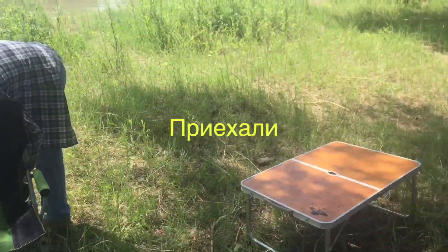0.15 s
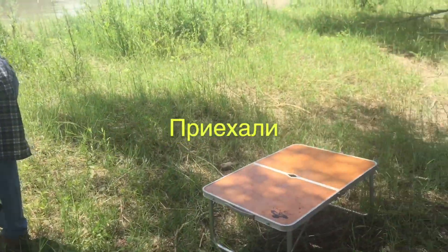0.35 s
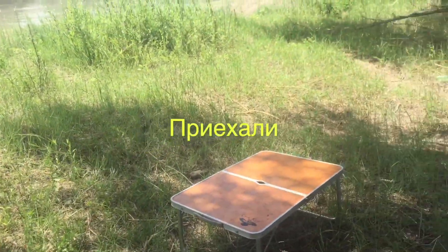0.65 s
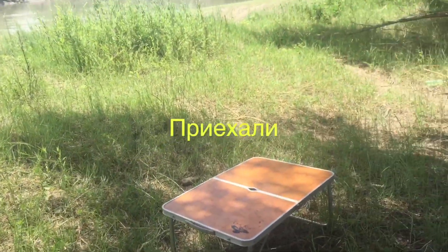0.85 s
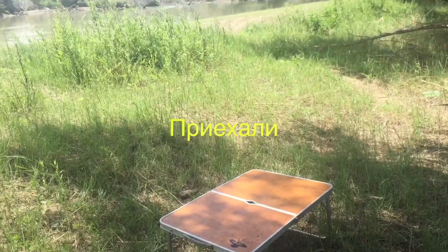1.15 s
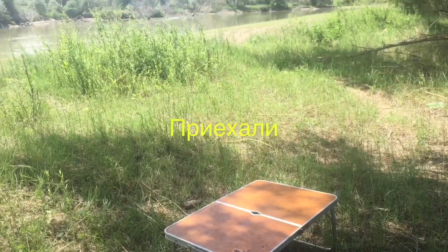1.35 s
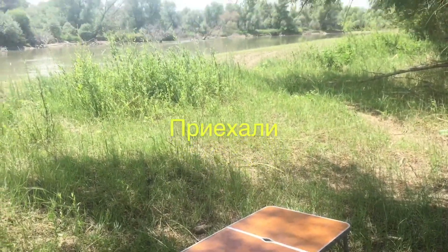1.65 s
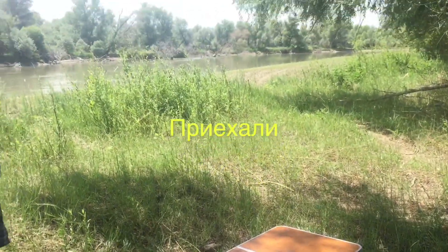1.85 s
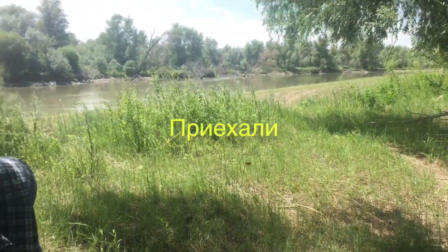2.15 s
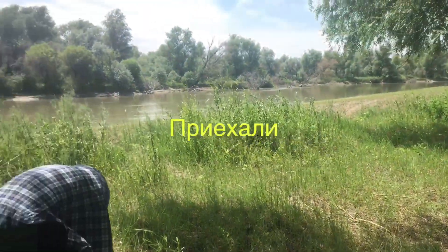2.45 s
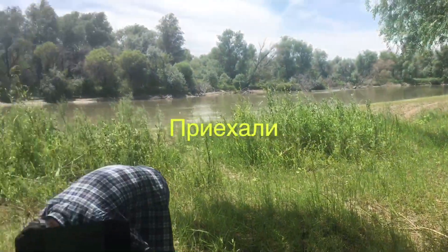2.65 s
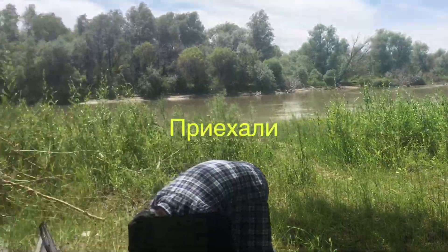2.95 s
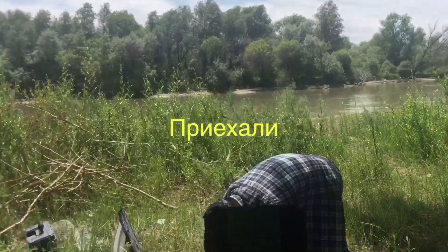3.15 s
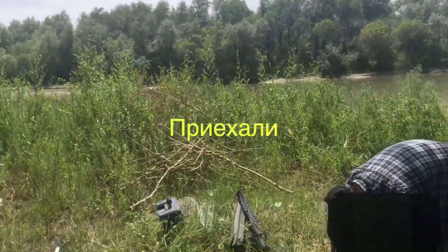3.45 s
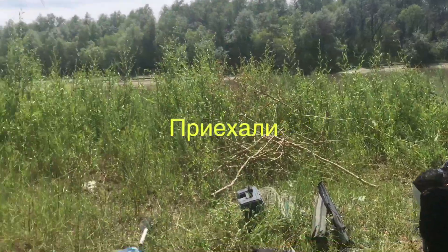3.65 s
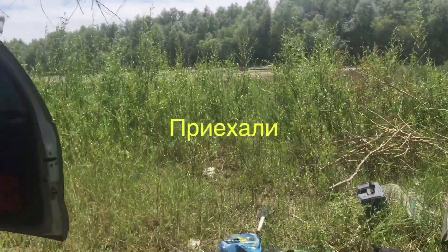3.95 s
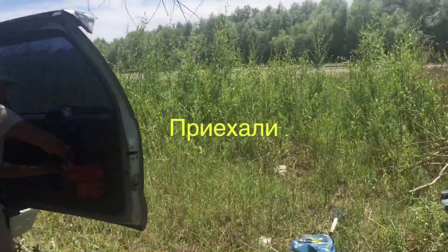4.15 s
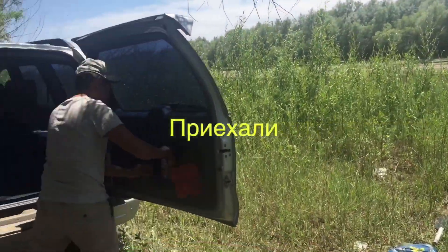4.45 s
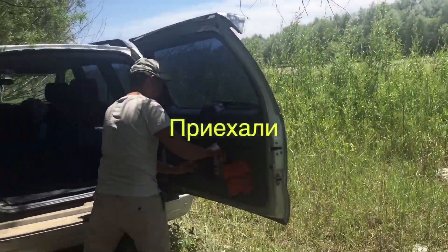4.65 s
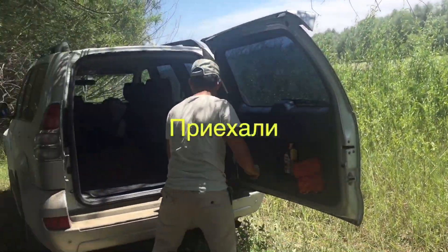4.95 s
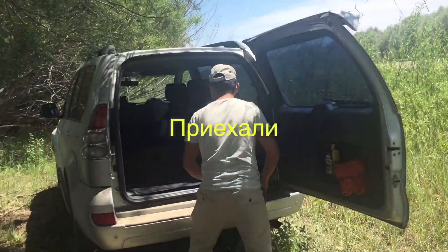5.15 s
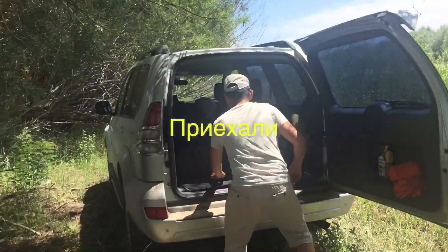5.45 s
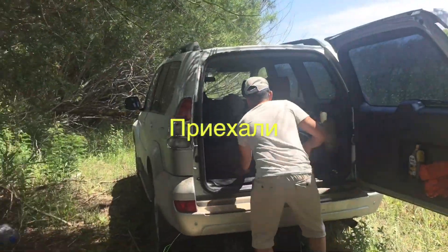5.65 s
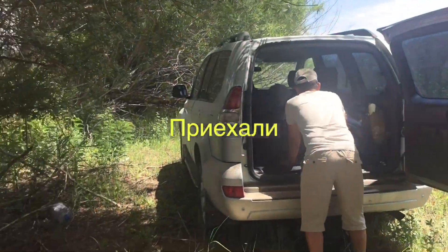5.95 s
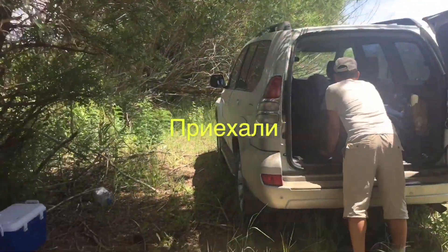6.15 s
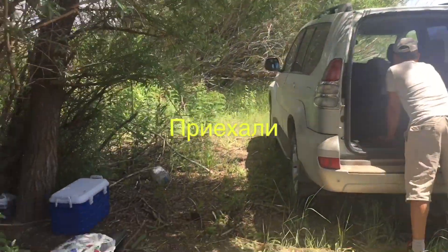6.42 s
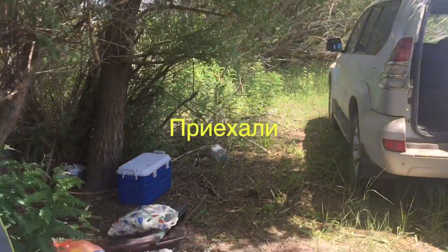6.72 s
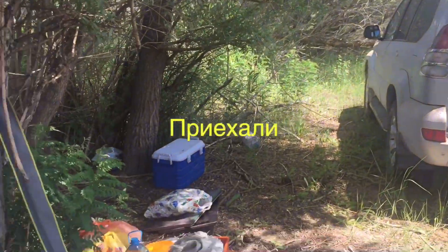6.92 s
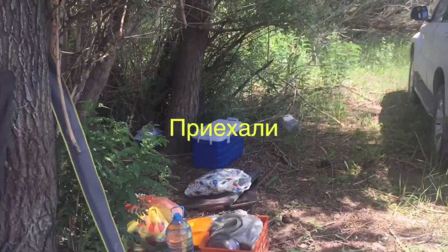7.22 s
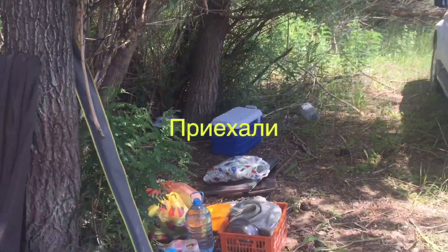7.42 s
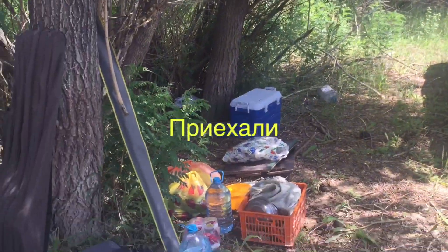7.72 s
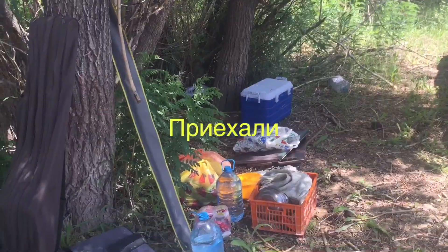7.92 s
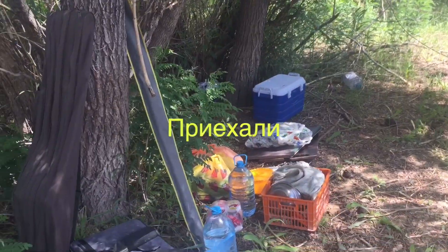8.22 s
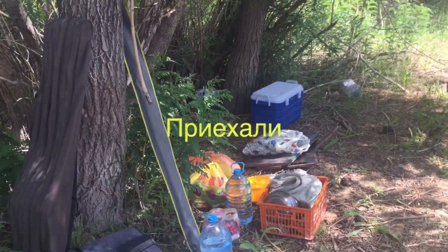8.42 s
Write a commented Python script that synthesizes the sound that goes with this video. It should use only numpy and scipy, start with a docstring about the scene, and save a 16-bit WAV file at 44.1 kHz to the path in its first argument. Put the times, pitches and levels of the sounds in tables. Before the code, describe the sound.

Outdoors under trees, bright birdsong with distant chirping birds, over soft air noise, as bags rustle, catches click and loads knock in a car boot.

```python
"""Riverside trees beside a car: a songbird sings slurs, sweeps, buzzes and a trill, in leafy echoes.
Its notes are gliding tones; other birds repeat short motifs further off, made of straight glides.
Close by, camping gear is unloaded: shaped noise makes cloth and bags rustle, short bursts make twigs and
catches click, and decaying tones and resonances make loads knock and thump on the boot floor.
A fly passes as a humming wing beat, over noise for ground, river, leaves and microphone hiss."""
import sys
import numpy as np
from scipy import signal
from scipy.fft import rfft, irfft, next_fast_len
from scipy.io import wavfile
from scipy.ndimage import uniform_filter1d, map_coordinates

SR = 44100
rng = np.random.default_rng(int(sys.argv[2]) if len(sys.argv) > 2 else 0)


def inscribe(sig):
    """Save sig as 16-bit PCM at rate SR to the path in sys.argv[1].

    A 1-D sig is mono; a 2-D sig holds one channel per row.
    Samples are clipped to [-1, 1] before scaling.
    """
    pcm = np.round(np.clip(np.atleast_2d(sig).T, -1, 1) * 32767)
    wavfile.write(sys.argv[1], SR, pcm.astype(np.int16))


N = 378378  # length of the scene in samples

# Levels here are mixing levels: echoes, random wavering and the microphone act on them later.

# The singer's slurs, sweeps. Each row: start in seconds, pitch factor, level in dB.
SLUR_TIMES = [(0.885, 0.95, -40), (1.039, 1.018, -38), (1.187, 0.98, -38), (1.32, 1.01, -39),
              (1.451, 1.01, -37)]
SWEEP_TIMES = [(4.838, 1.02, -52), (5.187, 0.98, -43.5), (5.468, 1.002, -41), (5.812, 1.04, -39),
               (6.093, 1, -37.5)]
# Buzzes. Each row: start in seconds, pitch factor, level in dB, pitch factor of the arch sung over it.
BUZZ_TIMES = [(6.315, 1.03, -49.5, 0.96), (6.521, 1.07, -52, 1.03), (6.713, 0.99, -50, 1.03),
              (6.9, 0.93, -52.5, 1.06), (7.097, 0.99, -49, 0.98)]
# Trill syllables. Each row: start in seconds, dip level in dB, tip level in dB.
TRILL_TIMES = [(7.448, -42, -40), (7.532, -41.5, -39.5), (7.616, -40, -39), (7.7, -41.5, -43),
               (7.789, -42, -44.5), (7.881, -46, -43.5), (7.971, -47, -43.5), (8.057, -45, -45),
               (8.151, -44.5, -45)]
# Shapes of single notes. Each row: seconds into the note, pitch in Hz, relative level in dB.
# The pitch of the first seven is scaled for each note sung; the time of the drop is stretched instead.
SWEEP_SHAPE = [(0, 7520, -24), (.008, 6250, -12), (.018, 5680, -10.5), (.046, 5210, -9.5),
               (.055, 4550, -4.5), (.064, 3150, -7.5), (.068, 2800, -11)]
CHUP_SHAPE = [(0, 2480, -9), (.007, 2658, -5), (.02, 2623, -1), (.03, 2430, -1.5), (.04, 2230, -11)]
BUZZ_SHAPE = [(0, 3880, -4.5), (.015, 4110, -0.5), (.04, 4197, -2.5), (.06, 4404, -2)]
ARCH_SHAPE = [(0, 3000, -15), (.013, 4100, -2), (.033, 5600, -17), (.043, 6950, -9), (.051, 6900, -7.5),
              (.058, 5850, 2.5), (.08, 4500, -12.5)]
DIP_SHAPE = [(0, 4074, -4), (.004, 3865, 2), (.011, 3050, -12.5), (.018, 3550, -1)]
TIP_SHAPE = [(0, 3770, -0.5), (.004, 3995, 0.5), (.011, 4050, -2.5), (.015, 3900, -26)]
HUMP_SHAPE = [(0, 2470, -5.5), (.03, 2744, 0), (.058, 2890, -0.5), (.085, 2640, 3), (.125, 1870, -24)]
DROP_SHAPE = [(0, 2850, -5), (.008, 2600, 0.5), (.03, 2280, -4), (.055, 1760, -22)]
# Humps, whistles that rise and fall. Each row: start in seconds, pitch factor, level in dB.
HUMP_TIMES = [(.028, 0.98, -48.5), (0.504, 0.98, -45)]
# Drops, whistles that end low. Each row: start in seconds, length factor, level in dB.
DROP_TIMES = [(.373, 1, -45.5), (1.697, 0.51, -47.5)]
# One list for each single whistle. Each row: time in seconds, pitch in Hz, level in dB.
SINGLE_WHISTLES = [
    [(2.565, 4300, -60), (2.6, 3700, -53.5), (2.635, 3055, -48.5), (2.665, 2590, -63)],
    [(2.81, 2540, -56.5), (2.87, 3143, -45.5), (2.95, 3607, -42.5), (3.06, 4400, -48.5), (3.09, 4490, -59)],
    [(.811, 2510, -60), (.819, 2050, -55), (.838, 1760, -70)],
    [(3.15, 4900, -59), (3.166, 3960, -45.5), (3.199, 2153, -50.5), (3.25, 3985, -47), (3.274, 3000, -42),
     (3.308, 2964, -54)],
    [(3.36, 3760, -55), (3.385, 3700, -43.5), (3.412, 4400, -49), (3.44, 4250, -50.5), (3.48, 3470, -45.5),
     (3.55, 2720, -50.5), (3.63, 2190, -69)],
    [(6.205, 3730, -54), (6.24, 3630, -65), (6.28, 3960, -60), (6.31, 4380, -58)],
]
# A nasal note from both sides of the voice box.
# Each row: time in seconds, left pitch in Hz, right pitch in Hz, level in dB.
NASAL_NOTE = [(7.294, 1287, 1780, -60), (7.315, 1322, 1853, -52.5), (7.349, 1476, 1873, -51.5),
              (7.385, 1645, 1920, -44.5), (7.414, 1673, 1864, -57)]

# Motifs of further birds, as glides.
# Each row: seconds into the motif, length in seconds, first pitch in Hz, last pitch in Hz, relative level in dB.
HIGH_LOW_MOTIF = [(0, 0.0246, 4256, 4150, 0), (.045, 0.0324, 3450, 3070, 1.5)]
UP_DOWN_MOTIF = [(0, 0.01546, 1900, 2220, -4.5), (.048, 0.037, 2715, 2512, 0.5)]
HOOK_MOTIF = [(0, 0.028, 2850, 2820, 0.5), (.025, 0.021, 2820, 2390, -3), (.11, .018, 2280, 2900, -2.5),
              (.128, 0.019, 2900, 2305, -3)]
SEEP_MOTIF = [(0, 0.017, 5800, 5720, 0.0044)]
# When each motif is sung: first start in seconds, period in seconds, list of one level in dB per repeat.
HIGH_LOW_REPEATS = (1.667, .2318, [-71, -60, -55.5, -53.5, -61, -54, -53.5, -57.5])
UP_DOWN_REPEATS = (1.648, .1855, [-55.5, -49.5, -50, -52, -53, -49.5])
HOOK_REPEATS = (4.773, .277, [-61, -60, -64])
SEEP_REPEATS = (4.083, .1055, [-58, -61, -57, -62, -65])
# Single level peeps. Each row: start in seconds, first pitch in Hz, level in dB.
PEEP_TIMES = [(.772, 2570, -59.5), (2.65, 2620, -51), (2.692, 2440, -55.5), (3.936, 4270, -56.5),
              (3.972, 4250, -59.5), (4.349, 3230, -56.5), (4.39, 3160, -58.5), (4.008, 4450, -57),
              (4.5, 3023, -58), (6.79, 2620, -63), (7.07, 2620, -65)]

# Clicks of twigs and catches.
# Each row: start in seconds, then relative levels in dB of the bright, thin top and dull parts.
CLICK_TIMES = [(0.051, -49, -60, -58), (0.1577, -62, -82, -47.5), (0.2778, -50, -61, -52.5),
               (1.0239, -51, -75, -42), (1.574, -34, -48, -40), (2.4522, -27, -35, -39),
               (3.0965, -43, -60, -57), (3.8956, -49, -71, -50.5), (4.3269, -48, -75, -43.5),
               (4.446, -43, -63, -52.5), (4.6883, -49, -41, -51.5), (4.705, -46.5, -63, -61),
               (5.678, -49.5, -64, -62), (5.892, -63, -64, -43.5), (5.912, -60, -61, -70),
               (6.863, -47, -61, -68), (6.919, -58, -68, -57), (6.974, -43, -53, -67),
               (7.009, -55, -56, -72), (7.033, -41, -62, -60), (7.0379, -29.5, -44, -50),
               (7.048, -60, -48, -70), (7.0582, -44, -49, -53), (7.218, -51, -67, -78),
               (8.014, -62, -56, -85), (8.1967, -33, -49, -65), (8.2534, -40, -54, -59.5),
               (8.353, -51, -61, -57), (8.3757, -5.5, -25, -37), (8.53, -46.5, -83, -61)]
# Colour of the bright crack. Each row: frequency in Hz, relative level in dB.
BRIGHT_COLOUR = [(1470, -72), (2500, -13), (3930, -7.5), (5760, -3.5), (7060, -2), (10000, -6.5),
                 (13000, -43), (22000, -120)]
# Knocks. Each row: start in seconds, level in dB, main pitch in Hz, seconds to fall by 60 dB.
KNOCK_TIMES = [(0.273, -44.5, 531, 0.04), (0.629, -50, 239, 0.093), (1.764, -40.5, 175, 0.025),
               (1.77, -46, 75, .2), (4.44, -44.5, 708, 0.029), (4.689, -21, 553, 0.011),
               (4.728, -39, 570, 0.016), (5.118, -44, 1070, 0.023), (5.146, -47, 1000, 0.028),
               (5.854, -43, 1300, .012), (5.872, -38, 900, .012), (5.893, -26, 1380, 0.013),
               (5.899, -29.5, 910, 0.015), (5.912, -31, 1430, 0.011), (5.919, -36, 1100, 0.012),
               (5.959, -40, 1400, 0.0091), (6.913, -44, 338, 0.046), (7.033, -32.5, 919, 0.021),
               (7.057, -30, 573, 0.0092), (8.3761, -24.5, 450, 0.0097), (8.392, -43.5, 554, 0.061)]
# Thumps on the boot floor. Each row: start in seconds, relative level in dB, extra bass in dB.
THUMP_TIMES = [(3.734, -25, -11), (3.778, -34.5, -7.5), (3.858, -43, -16), (3.894, -39.5, -12),
               (4.037, -44.5, -3.5), (4.16, -39.5, -7), (4.175, -46.5, 6), (4.249, -43, -6),
               (4.327, -32, -7.5)]
# Resonances of the boot floor. Each row: centre in Hz, width in Hz, level in dB before the extra bass.
BOOT_FLOOR = [(56, 8.3, 9.5), (92, 11, 6), (126.6, 11.3, 10.5), (291.4, 31, -2.5), (410, 57, -12),
              (604, 163, -17), (1300, 460, -24.5)]
# Ringing tones of a steel catch and of a hollow panel.
# Each row: pitch in Hz, relative level in dB before a small random change, seconds to fall by 60 dB.
STEEL_CATCH = [(1740, -15, 0.37), (3202, 0.5, 0.43), (4170, -1, 0.046), (8700, -8, 0.16)]
HOLLOW_PANEL = [(111.8, 3, 1), (148, -1.5, 0.35), (315, -10.5, 0.94), (630, -15, 0.7)]
# The one blow on the catch: start in seconds, level in dB.
CATCH_HIT = (2.452, -35)
# Blows on the panel. Each row: start in seconds, level in dB.
PANEL_HITS = [(.29, -48.5), (0.518, -56.5)]
# A box slides. Each row: time in seconds, level in dB.
DRAG_LEVEL = [(6.32, -73), (6.428, -49.5), (6.57, -75)]
# Hollow resonances of the box, each pass. Each row: centre in Hz, width in Hz, level in dB.
BOX_HOLLOW = [(450, 66, 4), (1146, 140, -2)]
# Cloth and bags are moved. Each row: start in seconds, length in seconds, crisp level in dB, dull level in dB.
RUSTLE_TIMES = [(0.013, 0.1, -62.5, -59.5), (0.423, 0.27, -68, -63), (1.148, 0.43, -74, -59.5),
                (1.557, 0.035, -54, -55), (1.893, 0.047, -68, -55.5), (2.035, 0.17, -65.5, -55),
                (2.196, 0.41, -57, -51), (2.988, 0.27, -68, -69), (3.298, 0.31, -61.5, -60.5),
                (3.848, 0.45, -57.5, -62), (4.15, 0.39, -61.5, -62.5), (4.524, 0.21, -64, -63),
                (5.05, 0.19, -73, -62), (5.798, 0.13, -60, -60.5), (6.904, 0.17, -53.5, -62),
                (6.996, 0.099, -57.5, -79), (7.117, 0.096, -62, -77), (7.696, 0.13, -60, -70.5),
                (8.234, 0.083, -61.5, -64)]

# A passing fly. Each row: time in seconds, wing beat in Hz, level in dB.
FLY_PATH = [(7.08, 172, -76), (7.18, 170, -71), (7.39, 154.6, -73), (7.5, 147, -78)]
# Overtones of the wing. Each row: multiple of the beat, relative level in dB.
WING_TONES = [(1, 4), (2, -13)]
# Steps and shuffling in the grass. Each row: time in seconds, swish level in dB, rumble level in dB.
GROUND_LEVEL = [(0.0, -62.5, -66), (3.44, -68, -74.5), (4.16, -67, -60.5), (4.87, -73.5, -73),
                (7, -73.5, -69.5), (7.4, -76.5, -69.5), (7.75, -82, -72.5), (8.58, -64.5, -74)]
# Noise colours: crisp and dull rustling, a low rumble, and the air (river, leaves and microphone hiss).
# Each row: frequency in Hz, relative level in dB.
CRISP_COLOUR = [(1470, -39), (2500, -21), (5010, -2.5), (6250, -3.5), (10500, -6), (14000, -7),
                (16100, -13), (16500, -41)]
DULL_COLOUR = [(240, -23), (400, -10.5), (1050, -3.5), (1900, -5.5), (4000, -11.5), (5200, -24),
               (8800, -120)]
RUMBLE_COLOUR = [(18, -45), (30, -1), (68, -0.5), (150, 0.5), (347, -4.5), (500, -30), (750, -120)]
AIR_COLOUR = [(15, -51), (25, 7.5), (65, 8), (150, 1), (296, -2.5), (3150, -8.5), (4240, -8.5),
              (7710, -14.5), (15200, -15.5), (16500, -41)]


def singer():
    """The songbird's direct sound with its returns from leaves, trunks and the wood's edge."""
    song, direct = song_phrases()
    whistles = single_whistles()
    full_voice = song + whistles
    near = echoes(full_voice, t60=0.18, delay=0.003, bend=1.03, trunks=7.8)
    add(near, 0.021, amp(-12.5) * (direct + whistles))  # one broad trunk answers clearly
    wood_edge = echoes(full_voice, t60=0.07, delay=0.044, bend=1.6, trunks=6.0)
    return direct + amp(-2.5) * whistles + amp(-2.5) * near + amp(-17.0) * wood_edge


def song_phrases():
    """Repeated note shapes, as (song for the echoes, direct sound); facing changes only the direct sound."""
    song, direct = np.zeros((2, N))
    # a chup closes each sweep and follows a share of the sweeps' crescendo
    chup_db, follows = -45.5, 0.59
    chups = [(s + 0.08, 1, chup_db + follows * (db - chup_db)) for s, _, db in SWEEP_TIMES]
    buzzes = [(s, pitch, db) for s, pitch, db, _ in BUZZ_TIMES]
    # the other side of the voice box whistles a louder arch over each buzz
    arches = [(s + 0.0185, arch_pitch, db + 7) for s, _, db, arch_pitch in BUZZ_TIMES]
    # a trill syllable is a dip, then a tip; the pitch factor creeps up by 0.035 a second
    climb = lambda s: 1 + 0.035 * (s - TRILL_TIMES[0][0])
    dips = [(s, climb(s), db) for s, db, _ in TRILL_TIMES]
    tips = [(s + 0.02, climb(s), db) for s, _, db in TRILL_TIMES]
    # each row: note shape, times sung, direct gain in dB from the way the bird faces, flutter settings
    phrases = [
        (slur(), SLUR_TIMES, -14, {}),
        (SWEEP_SHAPE, SWEEP_TIMES, 1.5, {}),
        (CHUP_SHAPE, chups, 5, {}),
        (ARCH_SHAPE, arches, -4, dict(buzz_hz=139, swing=0.25)),
        (BUZZ_SHAPE, buzzes, -6, dict(buzz_hz=397.6, swing=2.7, rasp=0.08)),
        (DIP_SHAPE, dips, -2.5, dict(buzz_hz=296, swing=0.53, rasp=0.052)),
        (TIP_SHAPE, tips, -1.5, dict(buzz_hz=400, swing=0.5, rasp=0.06))]
    for shape, sung, facing_db, timbre in phrases:
        for s, pitch, db in sung:
            sound = amp(db) * note(np.multiply(shape, [1, pitch, 1]), **timbre)
            add(song, s, sound)
            add(direct, s, amp(facing_db) * sound)
    # the other side of the voice box adds a faint high buzz to each syllable, heard only in the echoes
    high_buzz = [(0, 5800, -57), (0.015, 5500, -63), (0.035, 6200, -58)]
    for s, *_ in TRILL_TIMES:
        add(song, s, note(high_buzz, buzz_hz=300, swing=1.2, rasp=0.1))
    return song, direct


def slur():
    """Rows of a slur: the pitch leaves its top and settles onto a held pitch; the level swells, then fades."""
    top_hz, rest_hz = 3840, 2793
    hold_s, settle_s, length_s = 0.005, 0.018, 0.085
    s = np.linspace(0, length_s, num=14)
    hz = rest_hz + (top_hz - rest_hz) * np.exp(-np.maximum(s - hold_s, 0) / settle_s)
    db = np.interp(s / length_s, [0, 0.6, 1], [-5, 0, -12.5])
    return np.c_[s, hz, db]


def single_whistles():
    """Humps, drops and other single gliding whistles, with the two-voiced nasal note."""
    whistles = np.zeros(N)
    for s, pitch, db in HUMP_TIMES:
        add(whistles, s, amp(db) * note(np.multiply(HUMP_SHAPE, [1, pitch, 1])))
    for s, stretch, db in DROP_TIMES:
        add(whistles, s, amp(db) * note(np.multiply(DROP_SHAPE, [stretch, 1, 1])))
    for rows in SINGLE_WHISTLES:
        add(whistles, rows[0][0], note(rows))
    add(whistles, NASAL_NOTE[0][0], nasal_note())
    return whistles


def nasal_note():
    """Two coupled membranes give octaves and a sum tone; most of these are louder than either voice."""
    (left, right), size = voice(NASAL_NOTE)
    # both sides flutter unevenly
    flutter = np.cumsum(rng.standard_normal((2, len(size))), axis=1) * 0.035
    left, right = np.array([left, right]) + flutter
    octaves = np.sin(2 * left) + amp(-17) * np.sin(2 * right)
    sum_tone = amp(-5) * np.sin(left + right)
    voices = amp(-15) * np.sin(left) + amp(-21) * np.sin(right)
    return size * (octaves + sum_tone + voices)


def note(rows, buzz_hz=0, swing=0, rasp=0):
    """A whistle with a faint octave; membrane flutter at buzz_hz adds sidebands, rasp makes it uneven."""
    (phase,), size = voice(rows)
    uneven = np.cumsum(rng.standard_normal(len(phase))) * rasp
    t = np.arange(len(phase)) / SR
    phase = phase + swing * np.sin(2 * np.pi * buzz_hz * t + uneven)
    return size * (np.sin(phase) + amp(-31.5) * np.sin(2 * phase))


def voice(rows):
    """Phase of each pitch column, its corners rounded, and the amplitude of a note with soft ends."""
    s, *pitches, db = np.transpose(rows)
    t = np.arange(s[0], s[-1], 1 / SR)
    edge = np.clip(np.minimum(t - s[0], s[-1] - t) / 0.0011, 0, 1)
    phases = []
    for hz in pitches:
        rounded = uniform_filter1d(np.interp(t, s, hz), size=len(t) // 12 + 1, mode="nearest")
        phases.append(2 * np.pi * np.cumsum(rounded) / SR)
    return phases, np.sqrt(2) * edge * amp(np.interp(t, s, db))


def far_birds():
    """Motifs of short straight glides, repeated at a steady pace, and single peeps, all with echoes."""
    chips = np.zeros(N)
    # a peep lasts 0.0295 s and loses 0.013 of its pitch
    glides = [(s, 0.0295, hz, hz * (1 - 0.013), db) for s, hz, db in PEEP_TIMES]
    # last entry: share of the starting pitch lost at each repeat
    motifs = [(HIGH_LOW_MOTIF, HIGH_LOW_REPEATS, 0), (UP_DOWN_MOTIF, UP_DOWN_REPEATS, 0),
              (HOOK_MOTIF, HOOK_REPEATS, 0), (SEEP_MOTIF, SEEP_REPEATS, 0.019)]
    for motif, (first, period, levels), sinks in motifs:
        for k, level in enumerate(levels):
            start, pitch = first + k * period, 1 - k * sinks
            for s, length, first_hz, last_hz, db in motif:
                glides.append((start + s, length, first_hz * pitch, last_hz * pitch, level + db))
    for s, length, first_hz, last_hz, db in glides:
        middle_hz = (first_hz + last_hz) / 2
        rows = [(0, first_hz, db - 3.5), (length / 2, middle_hz, db), (length, last_hz, db - 4.0)]
        add(chips, s, note(rows, buzz_hz=91.6, swing=0.59))
    return chips + amp(-7.0) * echoes(chips, t60=0.26, delay=0.013, bend=1.0)


def gear():
    """The load being handled: clicks, knocks, thumps and ringing parts."""
    return clicks() + knocks() + thumps() + ringing_parts()


def clicks():
    """Twigs and catches: bright, thin and dull bursts that die away within milliseconds, with echoes."""
    bright, thin, dull = np.zeros((3, N))
    t = np.arange(SR // 5) / SR
    for s, db, thin_db, dull_db in CLICK_TIMES:
        splinters = amp(-8.5 - 60 * t / 0.0063) * rng.standard_normal(len(t))
        add(bright, s, amp(db + 17.0) * ((t == 0) + splinters))  # a one-sample spike and its splinters
        add(thin, s, amp(thin_db + 17.0 - 60 * t / 0.0086) * rng.standard_normal(len(t)))
        add(dull, s, amp(dull_db + 21 - 60 * t / 0.024) * rng.standard_normal(len(t)))
    cracks = coloured(bright, BRIGHT_COLOUR)
    cracks += coloured(thin, [(8000, -18.0), (10500, 1.5), (16500, -3.0)])
    cracks += coloured(dull, [(300, -54), (800, -13.0), (1600, -2.5), (2600, -5.5), (5000, -27.0)])
    return cracks + amp(-7.0) * echoes(cracks, t60=0.19, delay=0.004, bend=0.97)


def knocks():
    """Each knock rings at a main pitch with a higher and a lower partner, then echoes."""
    low = np.zeros(N)
    for s, db, hz, t60 in KNOCK_TIMES:
        modes = [(hz, 0, t60), (1.65 * hz, -6, 0.39 * t60), (0.58 * hz, -8, t60)]
        add(low, s, amp(db) * ring(modes, attack=0.00041))
    return low + amp(-13) * echoes(low, t60=0.1, delay=0.0073, bend=0.74)


def thumps():
    """A push sets off the resonances of the boot floor, then the load rattles as it settles."""
    floor = np.zeros(N)
    t = np.arange(SR // 5) / SR
    for s, db, bass_db in THUMP_TIMES:
        push = amp(db + 23 - 60 * t / 0.0023)
        rattle = amp(db + 20.5 - 60 * t / 0.19) * rng.standard_normal(len(t))
        peaks = [(hz, width, level + (bass_db if hz < 160 else 0)) for hz, width, level in BOOT_FLOOR]
        add(floor, s, resonate(push + rattle, peaks))
    return floor


def ringing_parts():
    """Blows make a hollow panel and a steel catch ring at their own pitches."""
    rings = np.zeros(N)
    for s, db in PANEL_HITS:
        add(rings, s, amp(db) * ring(HOLLOW_PANEL, attack=0.0021))
    s, db = CATCH_HIT
    add(rings, s, amp(db) * ring(STEEL_CATCH, attack=0.0004))
    return rings


def drag():
    """A sliding box: friction noise passes twice through its two hollow resonances."""
    s, db = np.transpose(DRAG_LEVEL)
    hollow = resonate(resonate(rng.standard_normal(N), BOX_HOLLOW), BOX_HOLLOW)
    level = amp(np.interp(np.arange(N) / SR, s, db, -120, -120))
    return level * unit(hollow)


def rustle():
    """Each movement of cloth or bags is a swell of uneven noise with small grains, over a low rumble."""
    crisp, dull, low = np.zeros((3, N))
    for s, length, crisp_db, dull_db in RUSTLE_TIMES:
        swell = np.hanning(round(length * SR)) ** 0.4
        add(crisp, s, amp(crisp_db) * swell)
        add(dull, s, amp(dull_db) * swell)
        add(low, s, amp(max(crisp_db, dull_db) - 8) * swell)  # 8 dB below the louder of the two
    # about 300 grains a second, of random strength
    grains = (rng.random(N) < 300 / SR) * rng.standard_normal(N) * amp(2 * rng.exponential(size=N))
    source = amp(2.1 * wobble(45)) * (patchy(depth_db=3.5) + 0.33 * unit(grains))
    crisp_part = crisp * unit(coloured(source, CRISP_COLOUR))
    dull_part = dull * amp(2.6 * wobble(30)) * unit(coloured(source, DULL_COLOUR))
    rumble = low * amp(3 * wobble(25)) * unit(coloured(rng.standard_normal(N), RUMBLE_COLOUR))
    return crisp_part + dull_part + rumble


def fly():
    """An unsteady wing beat and its octave, sinking in pitch as the fly goes by."""
    (phase,), size = voice(FLY_PATH)
    phase = phase + np.cumsum(rng.standard_normal(len(phase))) * 0.0084
    hum = size * sum(amp(db) * np.sin(k * phase) for k, db in WING_TONES)
    out = np.zeros(N)
    add(out, FLY_PATH[0][0], hum)
    return out * amp(5.2 * wobble(25))


def ground():
    """Steps and shuffling in the grass: a patchy noise swish over a lumpy low rumble."""
    s, *levels = np.transpose(GROUND_LEVEL)
    swish_db, rumble_db = [np.interp(np.arange(N) / SR, s, db) for db in levels]
    swish = amp(swish_db + 3.74 * wobble(20)) * unit(coloured(patchy(depth_db=4.5), DULL_COLOUR))
    rumble = unit(coloured(rng.standard_normal(N), RUMBLE_COLOUR))
    return swish + amp(rumble_db + 3.0 * wobble(17)) * rumble


def air():
    """River, leaves and microphone hiss as coloured noise, steady but for small patches."""
    return amp(-65 + 0.38 * wobble(9.8)) * unit(coloured(patchy(depth_db=4.0), AIR_COLOUR))


def echoes(x, t60, delay, bend, trunks=0):
    """Returns from leaves and, stronger, single trunks: noise tails, drawn anew every tenth of a second."""
    out, step, t = np.zeros(N), SR // 10, np.arange(SR // 2) / SR
    for at in range(0, N, step):
        strong = 1 + trunks * (rng.random(len(t)) < 70 / SR)  # about 70 trunk returns a second
        # bend over 1 holds the tail up, then drops it where the trees end
        tail = strong * rng.standard_normal(len(t)) * amp(-60 * (t / t60) ** bend)
        add(out, at / SR + delay, signal.fftconvolve(x[at:at + step], tail / np.linalg.norm(tail)))
    return out


def ring(modes, attack):
    """Decaying tones of a struck object, at slightly different strengths for each blow."""
    t = np.arange(SR // 2) / SR
    tones = sum(amp(db + rng.normal(0, 0.37) - 60 * t / t60) * np.sin(2 * np.pi * hz * t)
                for hz, db, t60 in modes)
    return (1 - np.exp(-t / attack)) * tones


def resonate(x, peaks):
    """x through (Hz, width in Hz, dB) resonances side by side, every second one turned upside down."""
    def response(f):
        total = 0
        for k, (centre, width, db) in enumerate(peaks):
            damping = 1j * f * width
            total = total + (-1) ** k * amp(db) * damping / (centre * centre - f * f + damping)
        return total
    return filtered(x, response)


def patchy(depth_db):
    """Noise whose level varies at random over patches of pitch and time."""
    z = signal.stft(rng.standard_normal(N), nperseg=512)[2]
    field = uniform_filter1d(rng.standard_normal(z.shape), size=4, axis=0)
    field = uniform_filter1d(field, size=8, axis=1)
    return signal.istft(z * amp(depth_db * unit(field)), nperseg=512)[1][:N]


def coloured(x, spectrum):
    """x shaped by (Hz, dB) points on a log frequency axis."""
    f, v = np.transpose(spectrum)
    return filtered(x, lambda hz: amp(np.interp(np.log(hz + 1), np.log(f + 1), v)))


def filtered(x, response):
    """x with its spectrum multiplied by a response of frequency."""
    m = next_fast_len(len(x) + SR // 2)
    return irfft(rfft(x, m) * response(np.fft.rfftfreq(m, 1 / SR)), m)[:len(x)]


def wobble(rate):
    """A smooth random curve through rate random points a second."""
    return map_coordinates(rng.standard_normal(int(N * rate / SR) + 4), [np.arange(N) * rate / SR])


def amp(db):
    """Gain of a level in dB."""
    return 10 ** (np.asarray(db) / 20)


def unit(x):
    """x scaled to an average (rms) strength of 1."""
    return x / np.sqrt(np.mean(x ** 2) + 1e-20)


def add(track, s, x):
    """Mixes x into the track from time s in seconds."""
    part = track[round(s * SR):][:len(x)]
    part += x[:len(part)]


def scene():
    """Everything reaches one microphone."""
    birds = singer() + far_birds()
    unloading = gear() + drag() + rustle()
    return (birds + unloading + fly() + ground() + air())[None]


def record(dry):
    """The phone cuts deep bass, its port dips in the treble and loud peaks saturate; a low-pass follows."""
    cut_hz, dip_hz, width_hz, dip_db = 59.5, 10496, 511, -4.0
    full_scale, knee, top_hz = 0.93, 6, 15900  # a higher knee saturates more abruptly

    def port(hz):
        bass_cut = (1j * hz / (cut_hz + 1j * hz)) ** 3
        return bass_cut * amp(dip_db * np.exp(-((hz - dip_hz) / width_hz) ** 2))

    held = filtered(dry[0], port)
    held = held / (1 + np.abs(held / full_scale) ** knee) ** (1 / knee)
    # the low-pass fades out over 200 Hz around top_hz
    return filtered(held, lambda hz: np.clip((top_hz + 100 - hz) / 200, 0, 1))[None]


dry = scene()
out = record(dry)
inscribe(out)
```